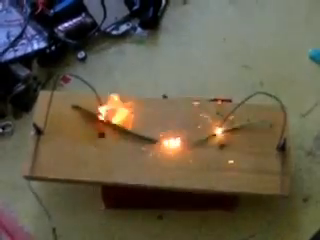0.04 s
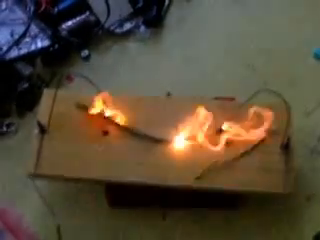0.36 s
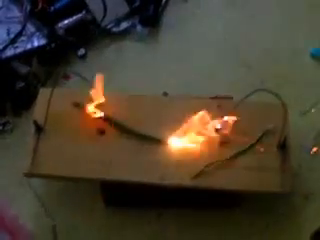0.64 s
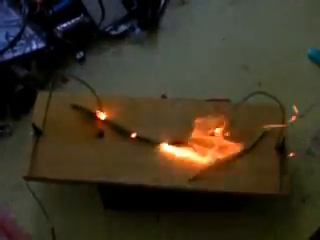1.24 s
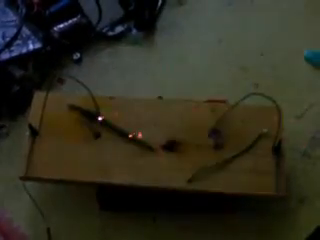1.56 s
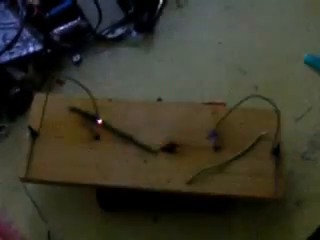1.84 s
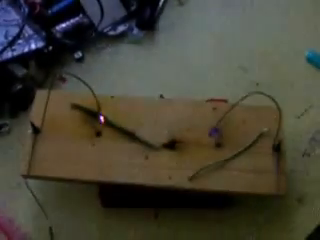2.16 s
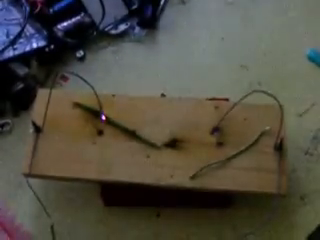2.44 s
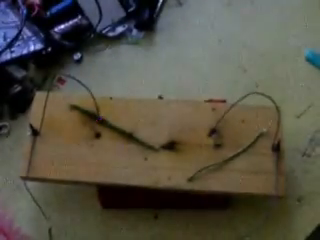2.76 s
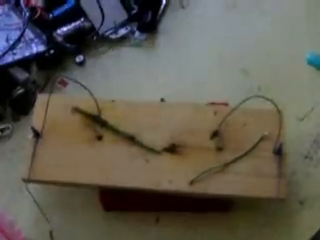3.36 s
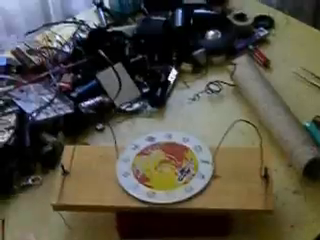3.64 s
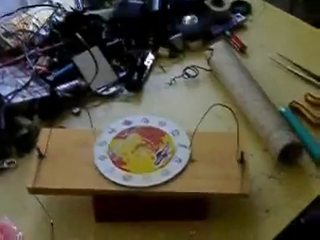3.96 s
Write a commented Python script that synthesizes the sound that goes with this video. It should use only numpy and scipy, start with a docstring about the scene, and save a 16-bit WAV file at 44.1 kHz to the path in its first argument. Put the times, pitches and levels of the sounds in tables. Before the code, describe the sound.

An electric arc burns along a plant stem with a loud, uneven buzz, crackling pops and a fluttering flame. It breaks suddenly, thin sparks sputter on, then a switch clicks, leaving a quiet small workshop.

```python
"""In a small workshop, a high-voltage arc burns along a plant stem on a wooden board.
Repeated breakdown of the air makes a fast, uneven buzz; boiling sap crackles and pops, and the flame
flutters. At 1.8 s the flame breaks and only thin sparks sputter on in a few swells, until a switch
clicks at 2.8 s and leaves the quiet room. The bench resonates and the walls add a short reverberation."""
import sys
import numpy as np
from scipy import signal
from scipy.fft import rfft, irfft
from scipy.io import wavfile
from scipy.ndimage import uniform_filter1d

SR = 44100
rng = np.random.default_rng(int(sys.argv[2]) if len(sys.argv) > 2 else 0)


def unload_wav(signal):
    """Save mono or channel-first audio to the path in sys.argv[1] as 16-bit WAV at rate SR, clipped to [-1, 1]."""
    wavfile.write(
        sys.argv[1],
        SR,
        np.round(np.clip(np.atleast_2d(signal).T, -1, 1) * 32767).astype(np.int16),
    )


N = 176400
TIME = np.arange(N) / SR

BREAK_S, BREAK_FALL_S = 1.793, .002
# Envelope of the burning arc: (time [s], level [dB])
ARC_ENVELOPE = [(0, -19), (.025, -28), (.038, -27), (.075, -23), (.32, -23), (.42, -29), (.51, -26),
                (.56, -24), (.62, -24.5), (.81, -23), (.9, -24.5), (1.05, -21), (1.12, -25), (1.2, -23),
                (1.243, -25.5), (1.262, -22.5), (1.29, -26), (1.31, -26), (1.33, -33), (1.365, -25.5),
                (1.415, -22), (1.475, -26.5), (1.51, -26.5), (1.54, -28), (1.585, -24.5), (1.64, -25.5),
                (1.705, -25), (1.79, -28.5)]
# Spectrum of one discharge: (frequency [Hz], relative density [dB])
ARC_SPECTRUM = [(40, -3), (100, -27.5), (200, -10), (310, -6), (365, -16), (440, -4.5), (520, -13.5),
                (830, -7), (1030, -9.5), (1450, -2), (1700, -2), (2050, 0), (2450, -4), (2800, 0.5),
                (3200, 0.5), (3450, -5), (3750, -10.5), (4600, -19), (5150, -30), (6050, -26),
                (6400, -27.5), (7000, -23), (8000, -33), (9400, -32), (10900, -29.5), (11800, -37),
                (12700, -38)]
def burning_arc(arc_db=-.84, buzz_db=-2, flicker_hz=108, flicker_db=.96):
    """Common modulation: buzz, crackle and flame flicker together and stop when the arc breaks."""
    alight = np.exp(-np.maximum(TIME - BREAK_S, 0) / BREAK_FALL_S)
    flicker, strength = drift(flicker_hz), envelope(ARC_ENVELOPE)
    discharges = from_db(buzz_db) * sparks(jitter=.45) + crackle()
    discharges = steady_power(discharges * from_db(flicker_db * flicker))
    arc = from_db(arc_db) * shaped(discharges * strength * alight, ARC_SPECTRUM)
    return arc + flame(flicker, strength, alight)


def sparks(jitter, rate_hz=368.55, spread_db=2.5, count=2200):
    """Relaxation oscillation: the gap charges and breaks down at uneven intervals and strengths."""
    interval_scatter, size_scatter = np.clip(rng.standard_normal((count, 2)), -2, 2).T
    times = np.cumsum(np.exp(jitter * interval_scatter) / rate_hz)
    return steady_power(impulses(times, from_db(spread_db * size_scatter)))


def crackle(bursts_per_s=4500, spread_db=3):
    """Shot noise: boiling sap gives dense, independent micro-bursts."""
    sizes = from_db(spread_db * np.minimum(rng.exponential(1, N), 3.5))
    signs = rng.choice([-1, 1], N)
    bursting = rng.random(N) < bursts_per_s / SR
    return steady_power(sizes * signs * bursting)


# Gaussian flare-ups of the flame: (time [s], standard deviation [s], level [dB])
FLAME_PUFFS = [(0.005, 0.013, -29), (0.17, 0.016, -36), (0.53, 0.1, -35), (0.722, 0.014, -35.5),
               (0.812, 0.013, -28.5), (0.887, 0.013, -29), (1.023, 0.015, -35), (1.07, 0.0083, -38),
               (1.24, 0.026, -37.5), (1.413, 0.011, -35), (1.785, 0.015, -28)]
# Spectrum of the flame: (frequency [Hz], relative density [dB])
FLAME_SPECTRUM = [(40, -24), (95, -10.5), (140, -13.5), (200, -3.5), (300, 0), (380, -3.5), (520, -8),
                  (850, -4.5), (1400, -2.5), (2500, -7), (5000, -36)]
def flame(flicker, strength, alight, flame_db=-21, flicker_db=3.5):
    """Combustion noise: the flame flutters with the arc and flares up in low puffs."""
    puffs = sum(from_db(db) * gaussian(TIME - at, width) for at, width, db in FLAME_PUFFS)
    flutter = steady_power(rng.standard_normal(N) * from_db(flicker_db * flicker))
    return shaped(flutter * (from_db(flame_db) * strength + puffs) * alight, FLAME_SPECTRUM)


# Single loud snaps: (time [s], relative pop peak [dB], relative crack peak [dB])
POP_EVENTS = [(.003, -7.5, -29), (.0061, -18, -34), (.026, -5, -34), (.0584, -8.5, -30), (.099, -12, -20),
              (.1254, -8.5, -31), (.1634, -12, -33), (.2125, -9, -29), (.2275, -21, -32), (.3628, -11, -34),
              (.3925, -13, -33), (.4937, -18, -35), (.5529, -10, -31), (.5682, -14, -33), (.5783, -13, -34),
              (.6238, -14, -27), (.6569, -19, -31), (.6651, -11, -34), (.7271, -9, -27), (.7733, -8.5, -32),
              (.7911, -5.5, -31), (.8065, -13, -32), (.8508, -9, -35), (.8909, -7, -29), (.9886, -7.5, -28),
              (1.0062, -8, -27), (1.023, -14, -30), (1.1097, -8, -26), (1.2215, -15, -34),
              (1.2592, -7, -34), (1.2682, -8, -28), (1.309, -6, -33), (1.3159, -12, -30),
              (1.3418, -4.5, -13), (1.356, -16, -37), (1.4113, -15, -30), (1.4994, -13, -38),
              (1.5132, -10, -14), (1.587, -10.5, -26), (1.616, -7, -27), (1.6883, -16, -23),
              (1.7403, -16, -35), (1.7911, -14, -31), (1.8931, -24, -46), (1.9338, -27, -49),
              (2.0351, -21.5, -46), (2.0528, -24, -39), (2.2978, -18, -40), (2.3017, -26, -40),
              (2.3177, -18.5, -40), (2.351, -18, -43), (2.3687, -26, -39), (2.4576, -33, -43),
              (2.4877, -17, -39), (2.4965, -16.5, -38), (2.5303, -26, -37)]
# Spectrum of the bright crack: (frequency [Hz], relative density [dB])
CRACK_SPECTRUM = [(300, -23), (2000, -18), (3300, 28), (4200, -5), (5200, -24), (7000, -19), (9500, -27),
                  (11500, -20), (12700, -14)]
def pops(snap_db=-2.7, spit_db=-18, spit_width_s=.0017):
    """Pressure transients: bursting sap, and later the strongest sparks, snap with a spit of crackle."""
    times, pop_db, crack_db = np.transpose(POP_EVENTS)
    snaps = np.zeros(N)
    for peak_db, spectrum in ((pop_db, ARC_SPECTRUM), (crack_db, CRACK_SPECTRUM)):
        bursts = impulses(times, from_db(peak_db + snap_db))
        snaps += shaped(bursts, spectrum) / np.abs(pulse(spectrum)).max()
    swell = gaussian(TIME[:SR] - .5, spit_width_s)
    spit_envelope = signal.fftconvolve(impulses(times, from_db(pop_db + spit_db)), swell, "same")
    return snaps + shaped(crackle() * spit_envelope, ARC_SPECTRUM)


# Envelope of the thin sparks after the flame breaks: (time [s], level [dB])
SPUTTER_ENVELOPE = [(1.79, -60), (1.836, -47), (1.942, -41.5), (1.965, -56), (2.005, -48), (2.034, -35),
                    (2.075, -42.5), (2.108, -45), (2.228, -42.5), (2.290, -42), (2.302, -32), (2.36, -39.5),
                    (2.445, -43.5), (2.462, -32), (2.485, -32.5), (2.516, -39), (2.582, -42), (2.614, -51),
                    (2.79, -53.5), (2.81, -80)]
# Spectrum of the air that the thin sparks push: (frequency [Hz], relative density [dB])
AIR_PUSH_SPECTRUM = [(100, -25), (220, -6), (310, 1), (420, -2), (520, -10), (680, -5), (950, -16),
                     (3000, -42)]
def sputter(spark_db=-1, sizzle_db=-8, push_db=-17, throb_hz=57.18, throb_peak_s=2.57, throb_db=1):
    """Thermal expansion: thin sparks throb and sizzle at the wire ends; heated air gives a low push."""
    throb = from_db(throb_db * np.cos(2 * np.pi * throb_hz * (TIME - throb_peak_s)))
    discharges = from_db(spark_db) * sparks(jitter=.22) + from_db(sizzle_db) * crackle()
    discharges *= envelope(SPUTTER_ENVELOPE) * throb * (TIME > BREAK_S)
    return shaped(discharges, ARC_SPECTRUM) + from_db(push_db) * shaped(discharges, AIR_PUSH_SPECTRUM)


# Impacts of the switch contacts: (time [s], snap level [dB], knock level [dB])
SWITCH_IMPACTS = [(2.8098, -29.5, -50.5), (2.8118, -32.5, -45), (2.8165, -43, -31.5), (2.8307, -47, -44.5)]
# Modes of the switch and its case: (frequency [Hz], relative level [dB], decay time T60 [s])
CASE_MODES = [(380, -3, 0.069), (594, -11.5, 0.42), (683, 0, 0.092), (827, 2, 0.026), (1050, -4.5, 0.048),
              (2820, -13, 0.12), (2965, -13.5, 0.14), (3320, -11, .03), (3600, -11, .025),
              (3950, -20, .025), (4300, -27, 0.018)]
# Spectrum of the contact snap: (frequency [Hz], relative density [dB])
SNAP_SPECTRUM = [(300, -28), (2300, -10), (3050, 8), (3900, 2), (4700, -14), (5800, -33), (7200, -14),
                 (8600, -27), (9700, -32), (11200, -24), (12500, -25)]
def switch(snap_t60_s=.018, knock_rise_s=.002):
    """Impact excitation: each contact snaps brightly and sets the damped modes of the case ringing."""
    times, snap_db, knock_db = np.transpose(SWITCH_IMPACTS)
    t = TIME[:SR]
    snap = shaped(dying_noise(snap_t60_s), SNAP_SPECTRUM)
    modes = sum(from_db(db - 60 * t / t60) * np.sin(2 * np.pi * hz * t) for hz, db, t60 in CASE_MODES)
    knock = (1 - np.exp(-t / knock_rise_s)) * modes
    snaps = convolve(impulses(times, from_db(snap_db)), snap / np.abs(snap).max())
    return snaps + convolve(impulses(times, from_db(knock_db)), knock)


# Resonances of the bench and the things on it: (frequency [Hz], bandwidth [Hz], gain [dB])
BENCH_RESONANCES = [(250, 10, -3), (313, 29, 3), (440, 30, 0.5), (715, 13, 4.5), (829, 14, 3.5),
                    (954, 21, 3), (1092, 18, 4.5), (1327, 31, 3), (1500, 27, 2)]
def bench(x):
    """Forced vibration: the board and the clutter around it colour the sound in a few narrow bands."""
    out = x
    for hz, width, db in BENCH_RESONANCES:
        radius = np.exp(-np.pi * width / SR)
        feedback = [1, -2 * radius * np.cos(2 * np.pi * hz / SR), radius ** 2]
        band = (1 - radius ** 2) / 2 * signal.lfilter([1, 0, -1], feedback, x)
        out = out + (from_db(db) - 1) * band
    return out


def wandering_reflections(x, wander_hz=4.24, level_db=-13.5, t60_s=.017, delay_s=.00062, paths=8):
    """Interference: the arc moves about, so its early reflections from the bench top keep changing."""
    shares = np.array([drift(wander_hz) for _ in range(paths)])
    shares /= np.sqrt(np.sum(shares ** 2, axis=0))
    reflections = sum(convolve(x * share, dying_noise(t60_s, delay_s)) for share in shares)
    return x + from_db(level_db) * reflections


def workshop(x, tail_db=-9, t60_s=.4, delay_s=.0066, bass_db=-5.5, bass_t60_s=.49, bass_hz=670):
    """Reverberation: a short diffuse tail, fuller and longer in the bass, follows the direct sound."""
    low_pass = signal.butter(2, bass_hz, fs=SR, output="sos")
    bass = signal.sosfilt(low_pass, dying_noise(bass_t60_s, delay_s))
    tail = from_db(tail_db) * dying_noise(t60_s, delay_s) + from_db(bass_db) * bass
    return x + convolve(x, tail)


# Spectrum of the workshop background: (frequency [Hz], relative density [dB])
BACKGROUND_SPECTRUM = [(30, -8), (80, -10), (140, -4), (250, 0), (330, -1), (500, -3.5), (950, -6),
                       (1500, -8.5), (3100, -10), (3600, -14.5), (5000, -34.5), (7000, -34), (8000, -40),
                       (11000, -37.5), (12500, -56)]
def background(level_db=-48):
    """Stationary noise: the room and the microphone give a steady, faint hiss."""
    return from_db(level_db) * unit_rms(shaped(rng.standard_normal(N), BACKGROUND_SPECTRUM))


def from_db(db):
    """Amplitude ratio of a level in decibels."""
    return 10 ** (np.asarray(db) / 20)


def unit_rms(x):
    """Normalisation to an rms of 1."""
    return x / np.sqrt(np.mean(x ** 2) + 1e-20)


def steady_power(x, window=2200):
    """Running normalisation: the power stays near 1 over about 50 ms."""
    return x / np.sqrt(np.abs(uniform_filter1d(x ** 2, window)) + 1e-12)


def envelope(rows):
    """Gain by interpolation between rows of (time [s], level [dB])."""
    return from_db(np.interp(TIME, *np.transpose(rows)))


def gaussian(t, width):
    """Gaussian swell with a peak of 1 at t = 0."""
    return np.exp(-.5 * (t / width) ** 2)


def drift(hz):
    """Random fluctuation: low-passed noise with an rms of 1."""
    pole = np.exp(-2 * np.pi * hz / SR)
    return unit_rms(signal.lfilter([1], [1, -2 * pole, pole ** 2], rng.standard_normal(N + SR))[SR:])


def impulses(times, sizes):
    """Superposition of single-sample impulses at the given times."""
    out, at = np.zeros(N), (np.asarray(times) * SR).astype(int)
    np.add.at(out, at[at < N], np.asarray(sizes)[at < N])
    return out


def pulse(spectrum, skew=.69, size=8192):
    """Partly minimum-phase pulse of unit energy: skew 0 is symmetric, skew 1 starts abruptly."""
    hz, db = np.transpose(spectrum)
    grid_hz = np.maximum(np.fft.rfftfreq(size, 1 / SR), 1)
    magnitude = from_db(np.interp(np.log(grid_hz), np.log(hz), db))
    cepstrum = irfft(np.log(magnitude))
    cepstrum[1:size // 2] *= 2   # folding onto positive time gives the minimum phase
    cepstrum[size // 2 + 1:] = 0
    log_gain = rfft(cepstrum)
    shape = np.fft.fftshift(irfft(np.exp(log_gain.real + 1j * skew * log_gain.imag)))
    return shape / np.sqrt(np.sum(shape ** 2))


def shaped(x, spectrum):
    """Linear filtering: every impulse becomes a pulse with the given spectrum."""
    return signal.fftconvolve(x, pulse(spectrum), "same")


def convolve(x, response):
    """Causal convolution with an impulse response."""
    return signal.fftconvolve(x, response)[:N]


def dying_noise(t60_s, delay_s=0):
    """Exponential decay: noise of unit energy that starts after a delay."""
    t = TIME[:SR]
    tail = rng.standard_normal(SR) * from_db(-60 * t / t60_s) * (t >= delay_s)
    return tail / np.sqrt(np.sum(tail ** 2))


def scene(low_cut_hz=113):
    """Superposition in mono: arc and switch, both with little deep bass, sound over the background."""
    arc = wandering_reflections(bench(burning_arc() + pops() + sputter()))
    high_pass = signal.butter(2, low_cut_hz, "high", fs=SR, output="sos")
    sources = signal.sosfilt(high_pass, arc + switch())
    return (workshop(sources) + background())[None]


def record(dry, cutoff_hz=12800, offset=-.0514):
    """Band limiting: the top treble is cut steeply, and a constant offset is added."""
    return signal.sosfilt(signal.ellip(10, .1, 80, cutoff_hz, fs=SR, output="sos"), dry) + offset


dry = scene()
out = record(dry)
unload_wav(out)
```